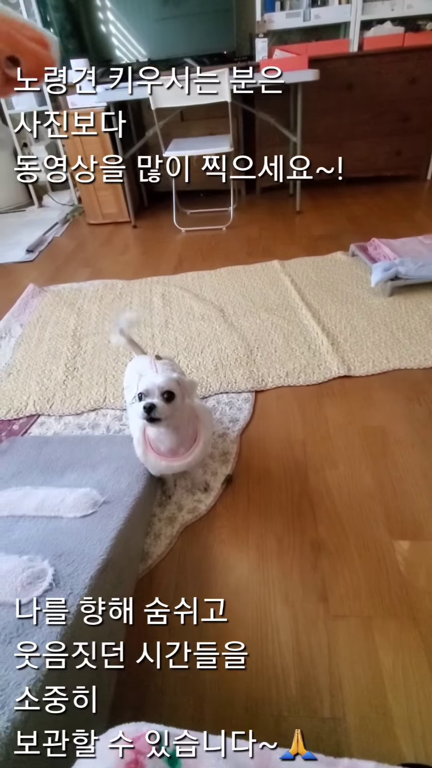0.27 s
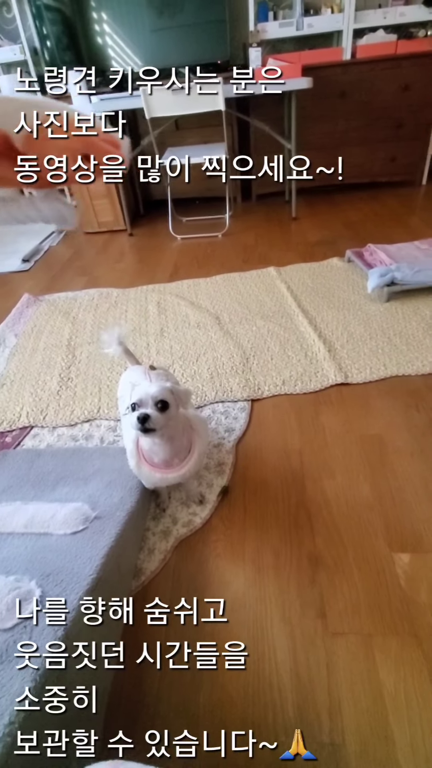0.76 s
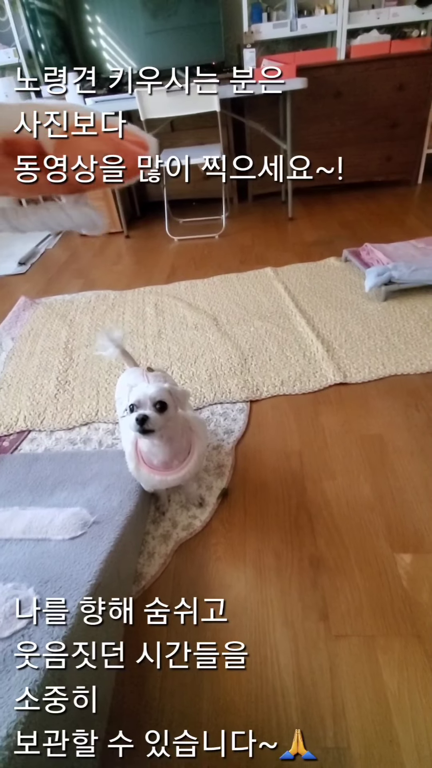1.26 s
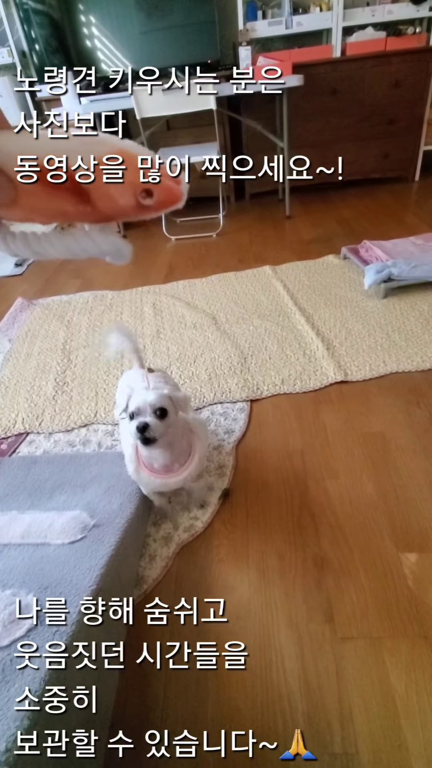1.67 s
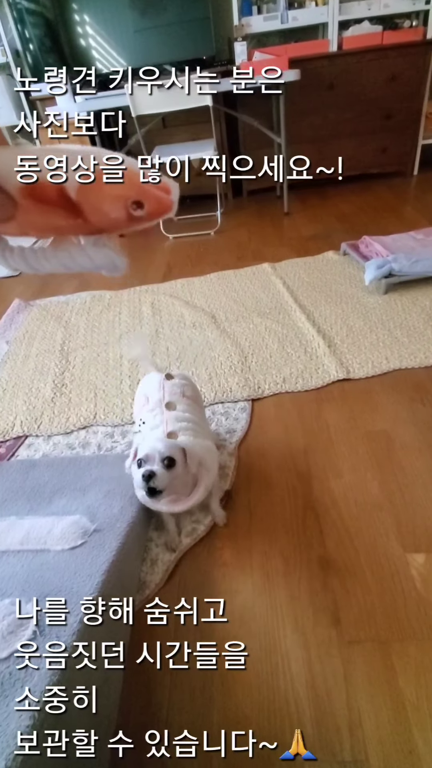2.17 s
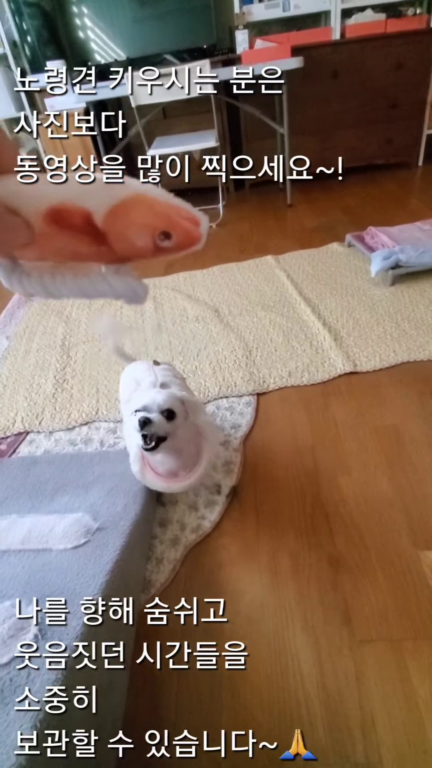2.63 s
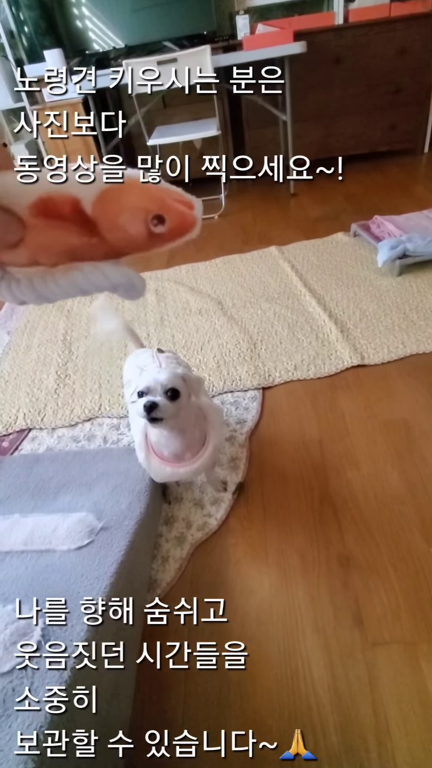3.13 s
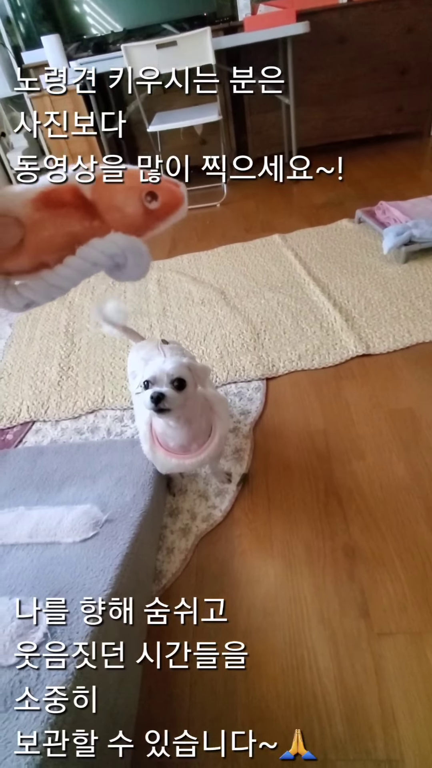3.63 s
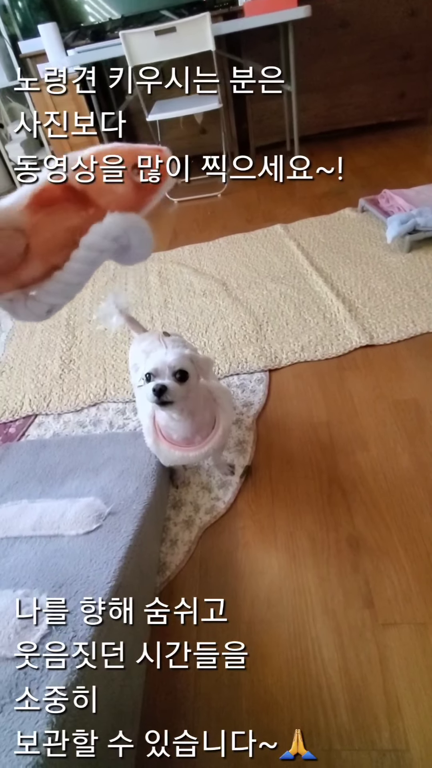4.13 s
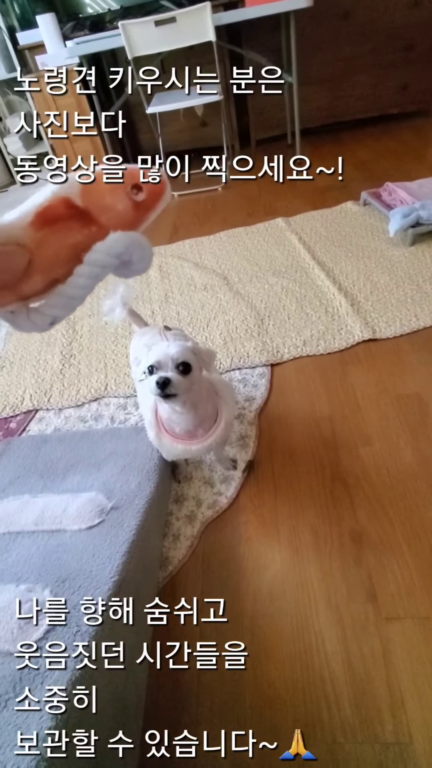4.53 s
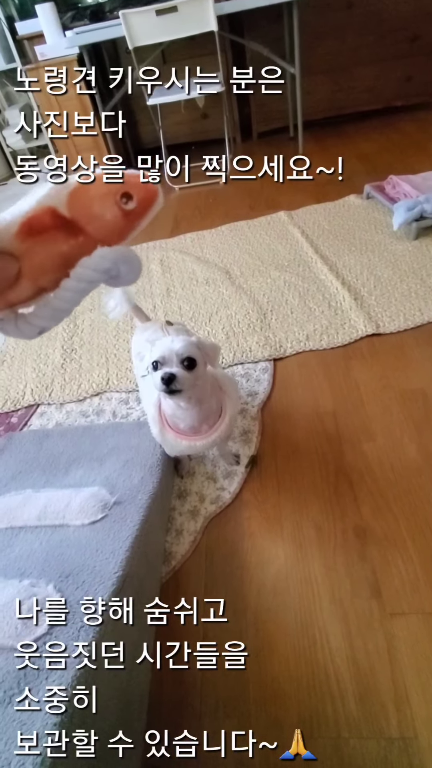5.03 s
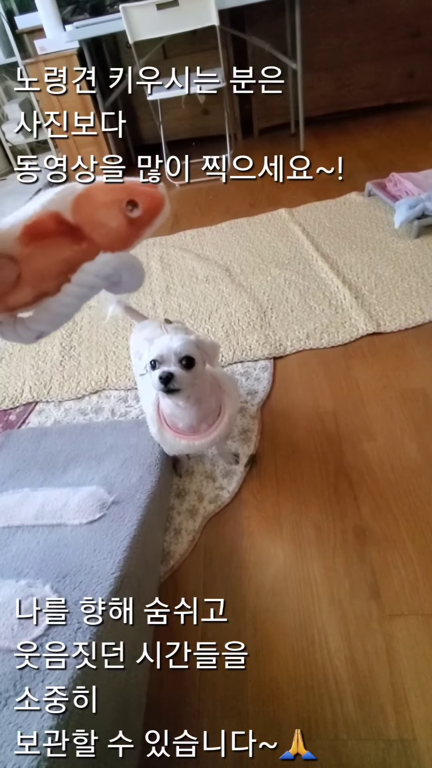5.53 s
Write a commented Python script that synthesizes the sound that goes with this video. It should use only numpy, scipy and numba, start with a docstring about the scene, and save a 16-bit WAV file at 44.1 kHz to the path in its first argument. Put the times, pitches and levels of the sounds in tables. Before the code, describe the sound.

Quick, reedy squeaks come from a plush toy squeezed near the microphone, alternating with softer, lower squeaks as air is drawn back in. After about two seconds a small dog lets out two loud, raspy barks and drops softly onto its paws. Two weak squeaks and a short lull lead into another run of squeezes. The place is a furnished room with a short echo and a faint low hum.

```python
"""Over mains hum and a low rumble, a plush toy is squeezed in a quick run in a living room: its reed
squeaks high on the squeeze and lower as air is drawn back. After two seconds a small dog barks twice,
hoarsely, its vocal folds slapping unevenly, then drops onto its paws as the toy gives two faint squeaks.
From 4.5 s comes a second quick run of squeezes. The room rings briefly after each sound."""
import sys
import numpy as np
from scipy import signal
from scipy.fft import rfft, irfft
from scipy.io import wavfile
from scipy.ndimage import uniform_filter1d
from numba import njit

SR = 44100
rng = np.random.default_rng(int(sys.argv[2]) if len(sys.argv) > 2 else 0)


def file_out(sig):
    """Save sig as 16-bit WAV at sys.argv[1]."""
    # one column per channel
    cols = np.atleast_2d(sig).T
    # limit, then scale
    lim = np.clip(cols, -1, 1)
    pcm = np.round(lim * 32767).astype(np.int16)
    wavfile.write(sys.argv[1], SR, pcm)


N = 268833
TOP_HZ = 15900  # upper edge of the sound

REED_WAVER, REED_FLUTTER = .006, .007  # slow and fast unevenness of the pitch
OFF_AXIS_LOSS = 0.15  # dB of treble lost for each dB that it leans to the left
# air rasping past the reed: frequency_hz, gain_db
AIR_SPECTRUM = [(400, -30.5), (1000, -2.5), (2500, 2), (4800, -10.5), (7000, -7), (11000, -1.5),
                (13000, -4.5), (15500, -9.5)]
def reed(length, top_hz, level_db, treble_db, pan_db, crest, rise, fall, partials,
         attack_s, stall_s, fade_s, droop_db, air_db):
    """Self-sustained oscillation: a reed's pitch follows the air pressure, and flutters as it stalls."""
    t = np.arange(int((length + .02) * SR)) / SR
    progress = np.minimum(t / length, 1.1)
    # rise and fall are shares of the top pitch, which lies at the crest (0-1 along the puff)
    climb = rise * np.clip(1 - progress / crest, 0, 1) ** 2
    sag = fall * np.maximum((progress - crest) / (1 - crest), 0) ** 1.7
    hz = top_hz * (1 - climb - sag + REED_WAVER * wobble(t, 130))
    hz *= 1 + REED_FLUTTER * (.5 + 2 * progress ** 4) * wobble(t, 1200)
    phase = 2 * np.pi * np.cumsum(hz) / SR
    harmonic = np.arange(1, 22)[:, None]
    # the hand muffles the toy a little differently on every puff
    gain = undb(read(partials, harmonic * hz) + 1.5 * rng.standard_normal(harmonic.shape))
    gain *= harmonic * hz < TOP_HZ
    tones = gain * np.sin(harmonic * phase + .5 * rng.standard_normal(harmonic.shape))
    # a hard squeeze bends the pitch further and drives more turbulence past the reed
    turbulence = unit(colour(rng.standard_normal(len(t)) * (1 + np.cos(phase)), AIR_SPECTRUM))
    air = undb(air_db) * (.5 + progress) * (0.24 + 5 * fall) * turbulence
    pressure = np.clip(t / attack_s, 0, 1) * undb(droop_db * (progress ** 2 - 1.35))
    # as the air runs out the reed stops slapping shut, and only its lowest partials swing on
    slapping = .5 - .5 * np.tanh((t - length + stall_s) / stall_s)
    swinging = .5 - .5 * np.tanh((t - length) / fade_s)
    fading = tones * np.where(harmonic <= 2, swinging, slapping)
    high = (harmonic * top_hz > 5500)[:, 0]
    body, treble = (fading[part].sum(0) / tones[part].sum(0)[t < length].std() + air * slapping
                    for part in (~high, high))
    # the treble beams towards one side
    sides = unit(undb(np.array([[pan_db], [-pan_db]]) / 2))
    return pressure * undb(level_db) * (body + undb(treble_db - OFF_AXIS_LOSS * pan_db) * treble * sides)


# the hand presses air out through the reed: start_s, length_s, top_pitch_hz, level_db
SQUEEZES = [(0.36, 0.033, 1190, -22.5), (0.69, 0.045, 1278, -23.5), (1.015, 0.039, 1307, -24),
            (1.284, 0.037, 1270, -25.5), (1.633, 0.037, 1348, -24.5), (1.927, 0.038, 1307, -25),
            (2.895, 0.034, 1160, -32.5), (3.246, 0.037, 1194, -34.5), (4.49, 0.04, 1160, -28.5),
            (4.858, 0.033, 1219, -26.5), (5.166, 0.036, 1263, -24), (5.454, 0.031, 1214, -24.5),
            (5.768, 0.032, 1214, -26), (6.071, 0.027, 1165, -27.5)]
# the toy fills again and draws air back: start_s, length_s, top_pitch_hz, level_db
RELEASES = [(0.238, 0.027, 848, -36), (0.501, 0.051, 870, -32.5), (0.84, 0.039, 865, -33),
            (1.138, 0.033, 868.7, -32.5), (1.757, 0.048, 873, -31.5), (2.071, 0.024, 838, -32.5),
            (2.401, 0.027, 841, -40), (4.996, 0.034, 853.6, -33), (5.287, 0.03, 841.6, -31.5),
            (5.888, 0.023, 847, -31.5)]
# the reed's partials on the outflow: frequency_hz, gain_db
SQUEEZE_SPECTRUM = [(1150, 0.5), (1350, -1.5), (2000, 1), (2400, 8), (3200, -9), (3800, -6.5),
                    (5000, -12.5), (7000, -26.5), (9000, -20.5), (10300, -1.5), (11300, -6.5),
                    (12100, -5.5), (13200, -24.5), (15500, -21)]
# the reed's partials on the inflow: frequency_hz, gain_db
RELEASE_SPECTRUM = [(830, 1), (1700, 5), (2550, 3.5), (3500, -10.5), (5200, -10), (7700, -5.5), (9300, -5),
                    (10400, 2), (12000, -14.5), (13500, -22.5), (15500, -21)]
# the toy turns from the left towards the middle: time_s, treble_left_minus_right_db
TOY_AIM = [(0.3, 9.5), (1.9, 9), (3.2, 9), (4.5, 3.5), (6.0, 4)]
# the lowest partial spreads all round the room, the second much less: frequency_hz, gain_db
TOY_SPREAD = [(1200, 4), (2300, -2), (3800, 8), (10000, -0.5)]
# acoustic shadow at the microphones: frequency_hz, left_minus_right_db
TOY_SHADOW = [(800, -3), (1200, 2), (1700, -5.5), (2400, -5.5), (3400, -7), (4800, 3.5), (6000, 1.5)]
def toy():
    """Bellows action: a toy close by on the left drives air out through its reed and sucks it back."""
    out = np.zeros((2, N))
    for start, length, hz, db in SQUEEZES:
        # a harder squeeze sounds higher, arches further and is brighter: pairs are (gentlest, hardest)
        by_force = lambda *pair: np.interp(hz, (1160, 1320), pair)
        add(out, start, reed(
            length, hz, db, treble_db=by_force(-3, 0.86), pan_db=curve(TOY_AIM, start),
            crest=.47, rise=by_force(0.036, .17), fall=by_force(.14, .28), partials=SQUEEZE_SPECTRUM,
            attack_s=.0055, stall_s=0.0038, fade_s=0.002, droop_db=-0.5, air_db=by_force(-23.5, -18.5)))
    # the toy always springs back in the same way: an early top, then a slow sag
    for start, length, hz, db in RELEASES:
        add(out, start, reed(
            length, hz, db, treble_db=-0.3, pan_db=curve(TOY_AIM, start),
            crest=.2, rise=0.011, fall=.155, partials=RELEASE_SPECTRUM,
            attack_s=.0026, stall_s=.0045, fade_s=0.011, droop_db=-4.5, air_db=-15.5))
    radiated = colour((out + out.mean(0)) / 2, TOY_SPREAD)  # both sides of the toy reach the walls
    echoes = room(radiated, early_db=-9, early_s=0.0086, tail_db=-18.5, treble_db=0)
    return shadow([out[0], delay(out[1], ms=0.2431)], TOY_SHADOW) + echoes


BARK_ATTACK_S, BARK_RELEASE_S, BARK_SWELL_DB_PER_S, BARK_SAG_DB = 0.0099, 0.024, 151, 4
MOUTH_OPEN_S, MOUTH_SHUT_S, CHEST_HOLD_S, CHEST_FLOOR_DB = .032, .03, 0.029, -16.5
JITTER, SHIMMER_DB, RASP_DB, BREATH_DB = 0.2, 2.5, 4, -3  # each scaled by the roughness
SNARL_PLACE, SNARL_WIDTH_S = .74, .015  # a rush of air just before the mouth shuts; place is 0-1
# throat resonances: multiple_of_mouth_resonance, width_hz, gain_db
FORMANTS = [(.65, 560, 7), (0.999, 434.5, 19.5), (1.62, 753, -10), (2.5, 878, -18)]
# breath hissing through the teeth: frequency_hz, gain_db
HISS_SPECTRUM = [(500, -36), (1500, -2.5), (3500, 8), (5000, -4.5), (6000, -4), (8000, -7.5), (10500, 1.5),
                 (12500, -7.5), (15000, -9.5)]
def bark(length, pitch_hz, level_db, loudest_s, start_hz, open_hz, chest_db, hiss_db, snarl_db):
    """Source and filter: uneven vocal-fold slaps and breath ring the throat as the mouth opens and shuts."""
    t = np.arange(int(length * SR)) / SR
    opening = np.clip(t / MOUTH_OPEN_S, 0, 1)
    shutting = np.clip(1 - (length - t) / MOUTH_SHUT_S, 0, 1)
    hz = pitch_hz * (1 - .06 * (1 - opening) - .11 * shutting)
    mouth_hz = (start_hz + (open_hz - start_hz) * opening) * (1 - 0.16 * shutting)
    roughness = np.interp(opening, [0, 1], [.22, .94])  # the voice breaks up as the mouth opens
    cycles = np.cumsum(hz * np.exp(JITTER * roughness * wobble(t, 330))) / SR
    count = cycles.astype(int)
    shimmer = SHIMMER_DB * rng.standard_normal(count[-1] + 1)[count]
    size = undb(roughness * (shimmer + RASP_DB * (count % 3 == 0)))  # strain stresses every third slap
    slaps = np.diff(count, prepend=-1) * size
    airflow = size * (0.22 + np.exp(-(cycles % 1) / 0.18))
    source = unit(slaps) + undb(BREATH_DB) * roughness * unit(airflow * rng.standard_normal(len(t)))
    # each resonance acts twice, which keeps the valleys dark
    voice = sum(undb(db) * band(band(source, ratio * mouth_hz, width), ratio * mouth_hz, width)
                for ratio, width, db in FORMANTS)
    # the push of the lungs sets the loudness, however the single slaps fall
    push_db = level_db - np.interp(t, [0, loudest_s, length],
                                   [BARK_SWELL_DB_PER_S * loudest_s, 0, BARK_SAG_DB])
    voice = undb(push_db) * voice / np.sqrt(uniform_filter1d(voice ** 2, size=500) + 1e-12)
    clear = np.exp(-(t / CHEST_HOLD_S) ** 2) + undb(CHEST_FLOOR_DB)  # soon gives way to the rasp
    chest = undb(chest_db) * clear * unit(np.sin(2 * np.pi * cycles) + 0.8 * np.sin(4 * np.pi * cycles))
    rush = undb(hiss_db) + undb(snarl_db) * np.exp(-((t - SNARL_PLACE * length) / SNARL_WIDTH_S) ** 2)
    hiss = rush * unit(colour(np.sqrt(airflow) * rng.standard_normal(len(t)), HISS_SPECTRUM))
    envelope = np.clip(np.minimum(t / BARK_ATTACK_S, (length - t) / BARK_RELEASE_S), 0, 1)
    return (voice + chest + hiss) * envelope


# the barks: start_s, length_s, pitch_hz, level_db, loudest_after_s,
# mouth_start_hz, mouth_open_hz, chest_db, hiss_db, snarl_db
BARKS = [(2.154, 0.127, 234.6, -11.5, 0.014, 870, 1366, -24.5, -27.5, -24),
         (2.564, 0.122, 291.9, -10.5, 0.054, 1220, 1288, -27.5, -29.5, -47.5)]
# the chest tone hardly reaches the walls: frequency_hz, gain_db
BARK_SPREAD = [(250, -2.5), (600, 4)]
def dog():
    """Time and level cues place the barks slightly to the right; reflections give them distance."""
    out = np.zeros(N)
    for start, *shape in BARKS:
        add(out, start, bark(*shape))
    direct = undb([[-2], [-1]]) * np.array([delay(out, ms=.15), out])
    echoes = room(colour(out, BARK_SPREAD), early_db=-3, early_s=0.0048, tail_db=-10.5, treble_db=-12)
    return direct + echoes


# paws and claws on the floor: start_s, thump_db, tick_db
STEPS = [(2.963, -35, -36), (2.985, -35, -29), (3.003, -49, -48), (3.020, -44, -42)]
# small clicks: start_s, level_db
CLICKS = [(0.66, -43), (0.97, -42.5), (2.113, -47)]
# soft rustles of plush and fur: start_s, length_s, centre_hz, width_hz, level_db
RUSTLES = [(2.434, 0.12, 4120, 1110, -55), (2.724, 0.15, 5160, 2620, -58), (2.925, 0.14, 1780, 2520, -46)]
def contacts():
    """Impact and friction: paws, claws and clicks are damped noise bursts; rustles swell and fade."""
    out, t = np.zeros(N), np.arange(int(.1 * SR)) / SR
    for start, thump_db, tick_db in STEPS:
        thump = band_noise(len(t), 130, 180) * np.exp(-t / 0.0063) * np.clip(t / 0.0018, 0, 1)
        tick = band_noise(len(t), 2100, 8200) * np.exp(-t / 0.0018)
        add(out, start, undb(thump_db) * thump + undb(tick_db) * tick)
    for start, db in CLICKS:
        add(out, start, undb(db) * band_noise(len(t), 5500, 11000) * np.exp(-t / 0.00083))
    for start, length, hz, width, db in RUSTLES:
        n = int(length * SR)
        add(out, start, undb(db) * band_noise(n, hz, width) * np.hanning(n))
    return out + room(out, early_db=-2, early_s=0.0081, tail_db=-11, treble_db=2)


# the hum swells and fades slowly: time_s, level_db
HUM_LEVEL = [(0.05, -53), (0.28, -64), (1.11, -46), (1.9, -59), (1.97, -52), (3.31, -66.5), (4.07, -53.5),
             (4.68, -58.5), (5.25, -47), (6.1, -60)]
def mains_hum(hz=59.3):
    """Slow modulation: one low sinusoid drifts in level and slightly in pitch."""
    t = np.arange(N) / SR
    phase = 2 * np.pi * np.cumsum(hz + 0.3 * wobble(t, 1.5)) / SR
    return unit(np.sin(phase)) * undb(curve(HUM_LEVEL, t))


# spectral density of the rumble: frequency_hz, gain_db
RUMBLE_SPECTRUM = [(20, -8.5), (50, -2), (110, 1), (170, -10.5), (240, -8), (370, -6), (500, -18),
                   (800, -23.5), (2000, -36), (6000, -43), (16000, -42)]
# the rumble dips after the barks and creeps back: time_s, level_above_90_hz_db
RUMBLE_LEVEL = [(0.05, -67), (0.82, -60), (2.89, -66.5), (3.06, -71.5), (3.59, -73), (5.05, -62),
                (6.1, -62)]
def rumble():
    """Partial coherence: low noise, nearly alike on both sides."""
    mid, side = colour(rng.standard_normal((2, N)), RUMBLE_SPECTRUM)
    rms_above_90 = colour(mid, [(85, -60), (95, 0)]).std()
    pair = mid + undb(-6.5) * side * np.array([[1], [-1]])
    return pair / rms_above_90 * undb(curve(RUMBLE_LEVEL, np.arange(N) / SR))


# decay of the room, where fabrics soak up the treble: frequency_hz, reverberation_time_s
ROOM_T60 = [(150, 0.11), (600, 0.6), (1300, 0.45), (2200, 0.37), (4000, 0.29), (8000, 0.28), (15000, 0.25)]
def room(x, early_db, early_s, tail_db, treble_db):
    """Reverberation: sparse reflections off floor and furniture, then an exponential diffuse tail."""
    t = np.arange(int(.7 * SR)) / SR
    early = rng.standard_normal((2, len(t))) * (rng.random((2, len(t))) < .05)
    early *= np.exp(-t / early_s) * (t > .002)
    noise = diffuse(rng.standard_normal((2, len(t))))
    hz = np.arange(len(t) // 2 + 1) * SR / len(t)
    tail = 0
    for (_, t60), pick in zip(ROOM_T60, np.eye(len(ROOM_T60))):
        band_share = read(np.c_[np.array(ROOM_T60)[:, 0], pick], hz)
        tail += irfft(rfft(noise) * band_share, len(t)) * np.exp(-np.log(1000) * t / t60)
    tail *= np.clip(t / 0.02, 0, 1)
    response = undb(early_db) * whiten(diffuse(early), 400) + undb(tail_db) * whiten(tail, 400)
    response = colour(response, [(2000, 0), (12000, treble_db)]) * np.clip((.6 - t) / .1, 0, 1)
    return signal.fftconvolve(x * np.ones((2, 1)), response, axes=1)[:, :N]


def diffuse(pair, spacing_s=0.00045):
    """Diffuse-field coherence: two spaced microphones hear noise alike in the bass only."""
    n = pair.shape[1]
    coherence = np.sinc(2 * spacing_s * np.arange(n // 2 + 1) * SR / n)
    mid, side = rfft(pair) * np.sqrt([1 + coherence, 1 - coherence])
    return irfft(np.array([mid + side, mid - side]), n)


def whiten(response, width_hz):
    """Spectral whitening: broad humps and holes go, the fine ripple of many reflections stays."""
    n, spectrum = response.shape[1], rfft(response)
    power = uniform_filter1d(np.abs(spectrum) ** 2, int(width_hz * n / SR), axis=1)
    return irfft(spectrum / np.sqrt(power + 1e-12), n)


def shadow(pair, balance):
    """Acoustic shadowing: each frequency leans to one side."""
    return np.array([colour(x, [(hz, side * db / 2) for hz, db in balance])
                     for x, side in zip(pair, (1, -1))])


def delay(x, ms):
    """Travel time as a linear phase shift."""
    return irfft(rfft(x, 2 * N) * np.exp(-1j * np.pi * np.arange(N + 1) / N * SR * ms / 1000))[:N]


@njit
def svf(x, hz, width):
    """State-variable band-pass: two integrators in a loop, with a moving centre."""
    y, mid, low = np.empty(len(x)), 0., 0.
    for i in range(len(x)):
        gain, damping = np.tan(np.pi * min(hz[i], .45 * SR) / SR), width / hz[i]
        swing = (mid + gain * (x[i] - low)) / (1 + gain * (gain + damping))
        mid, low, y[i] = 2 * swing - mid, low + 2 * gain * swing, damping * swing
    return y


def band(x, hz, width):
    """One resonance, gain 1 at its centre."""
    return svf(x, hz * np.ones(len(x)), float(width))


def band_noise(n, hz, width):
    """Band-limited noise, rms 1."""
    return unit(band(band(rng.standard_normal(n), hz, width), hz, width))


def colour(x, points):
    """Spectral shaping by a table of frequency_hz, gain_db."""
    n = x.shape[-1]
    return irfft(rfft(x) * undb(read(points, np.arange(n // 2 + 1) * SR / n)), n)


def read(points, hz):
    """Interpolation on a log-frequency axis."""
    knots_hz, values = np.transpose(points)
    return np.interp(np.log(np.maximum(hz, 1)), np.log(knots_hz), values)


def curve(points, t):
    """Linear interpolation in time."""
    return np.interp(t, *np.transpose(points))


def wobble(t, rate):
    """Random modulation with a spread near 1, changing rate times a second."""
    knots = rng.standard_normal(int(t[-1] * rate) + 3)
    return np.interp(t * rate, np.arange(len(knots)), knots)


def undb(db):
    """Decibels to gain."""
    return 10 ** (np.asarray(db) / 20)


def unit(x):
    """Normalisation to rms 1."""
    return x / np.sqrt(np.mean(x ** 2) + 1e-20)


def add(track, start_s, sound):
    """Superposition of a sound on a track."""
    i = max(int(start_s * SR), 0)
    track[..., i:i + sound.shape[-1]] += sound[..., :max(N - i, 0)]


def scene():
    """Superposition of all sources, with hum and rumble leaning slightly to the right."""
    return toy() + dog() + contacts() + (mains_hum() + rumble()) * undb([[-1.1], [1.1]])


def record(dry):
    """Soft saturation rounds the loudest peaks; a steep low-pass cuts the top of the treble."""
    rounded = dry / (1 + (dry / .95) ** 6) ** (1 / 6)
    return signal.sosfilt(signal.ellip(10, .2, 70, TOP_HZ, fs=SR, output="sos"), rounded)


dry = scene()
out = record(dry)
file_out(out)
```